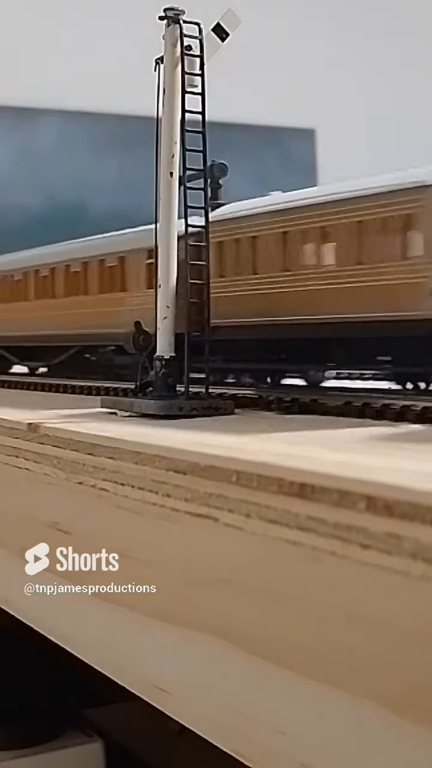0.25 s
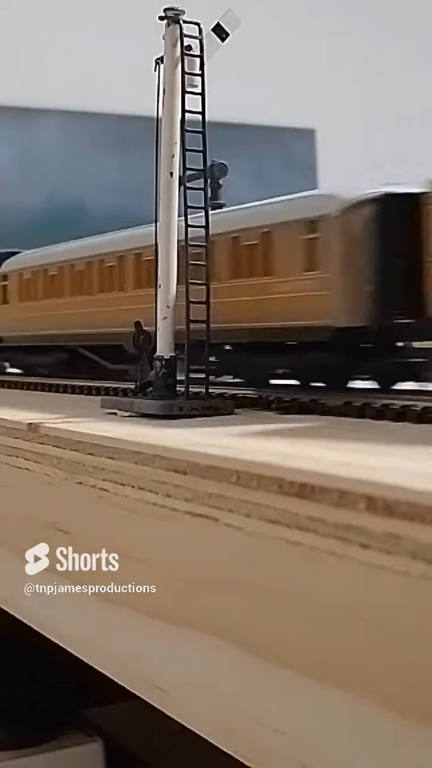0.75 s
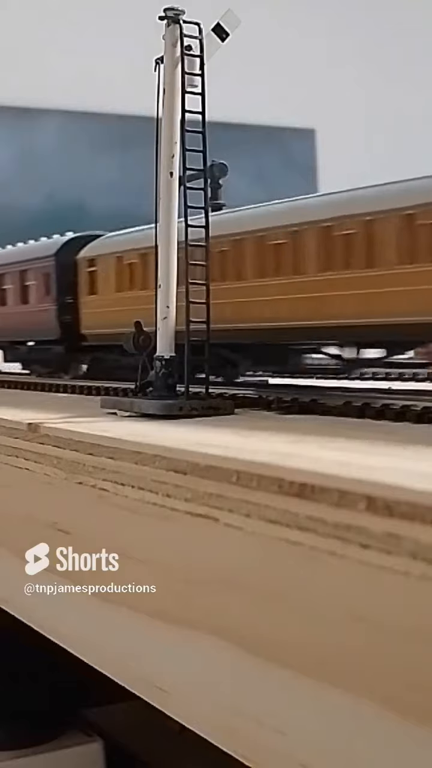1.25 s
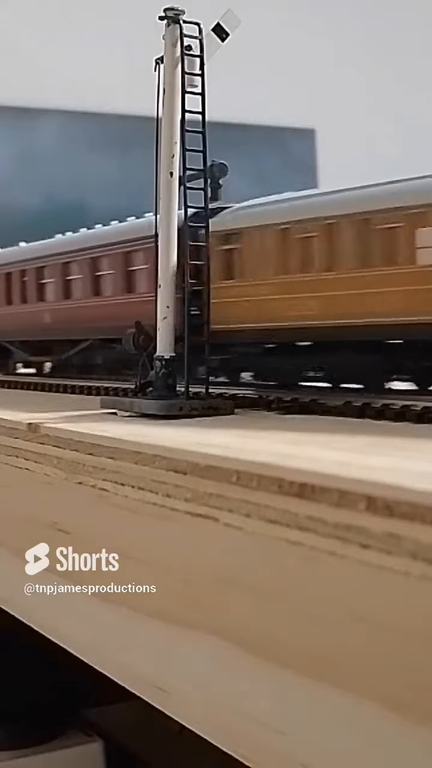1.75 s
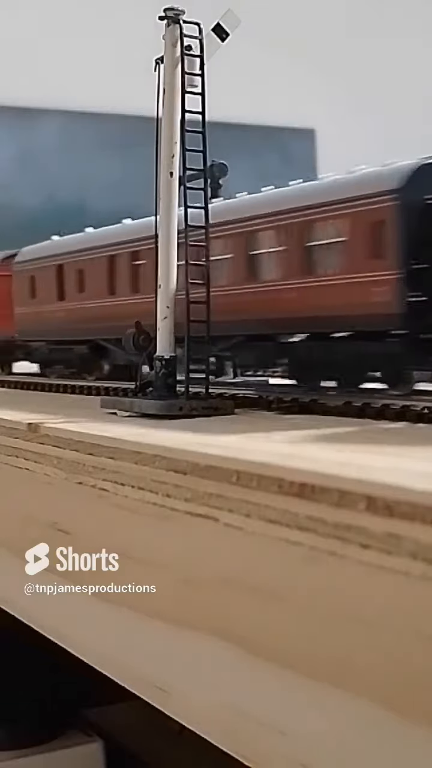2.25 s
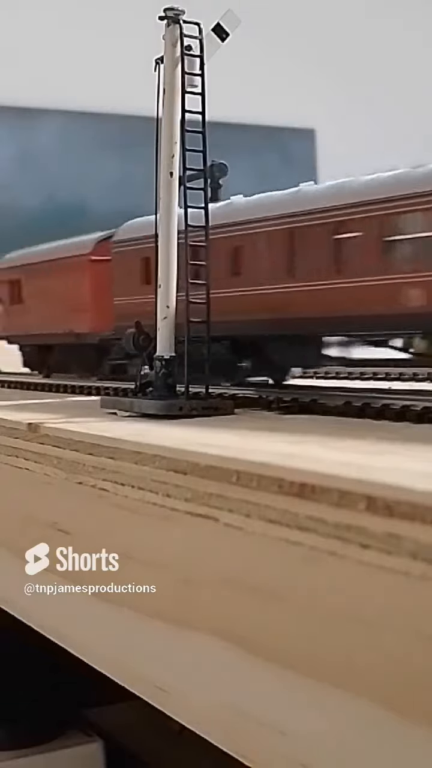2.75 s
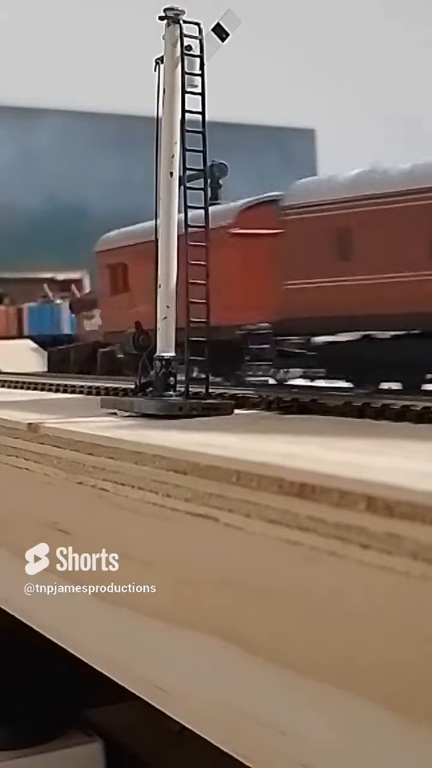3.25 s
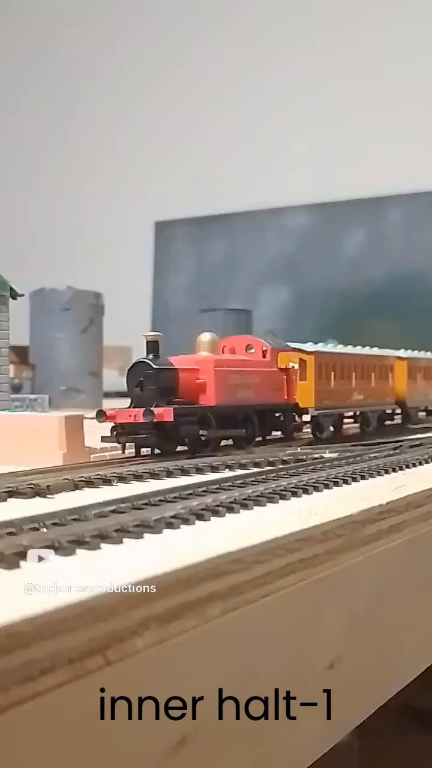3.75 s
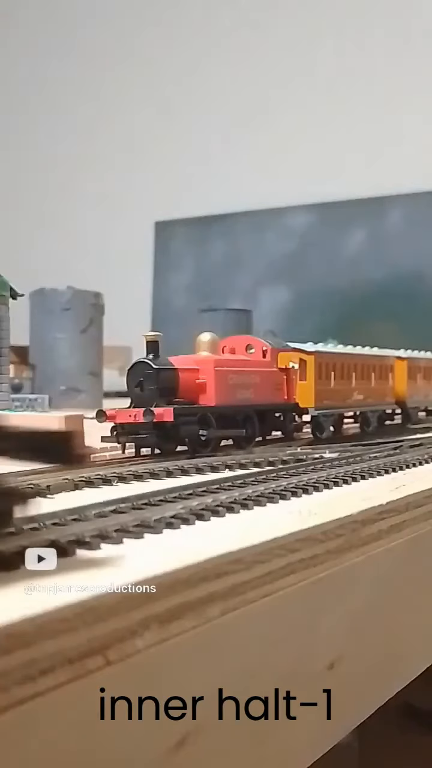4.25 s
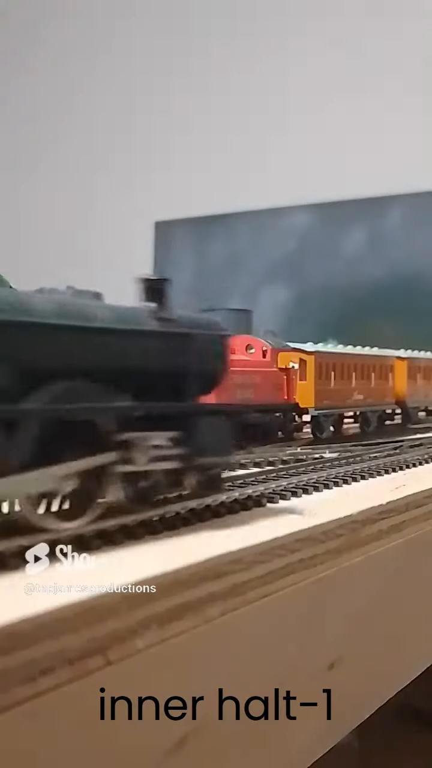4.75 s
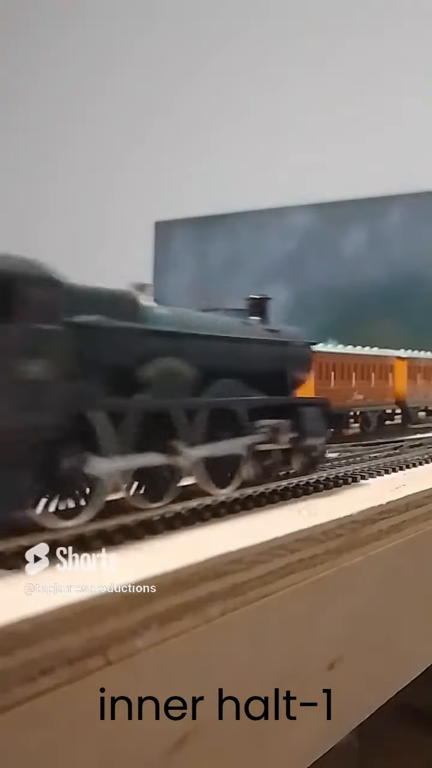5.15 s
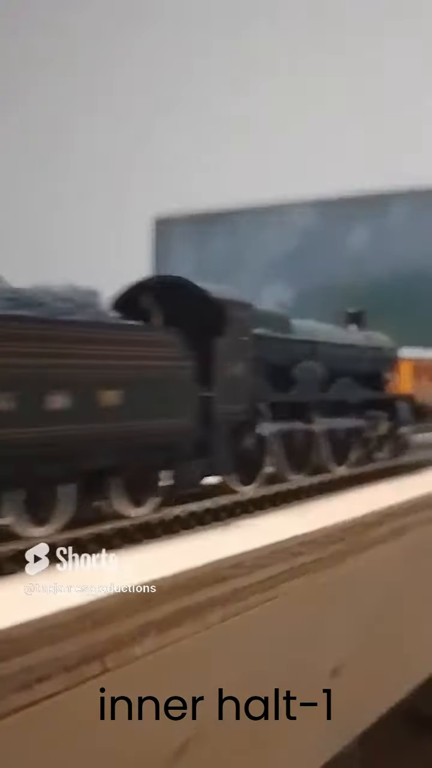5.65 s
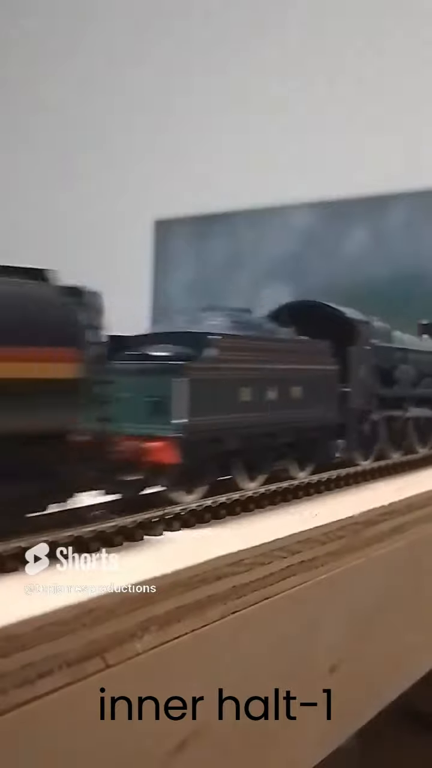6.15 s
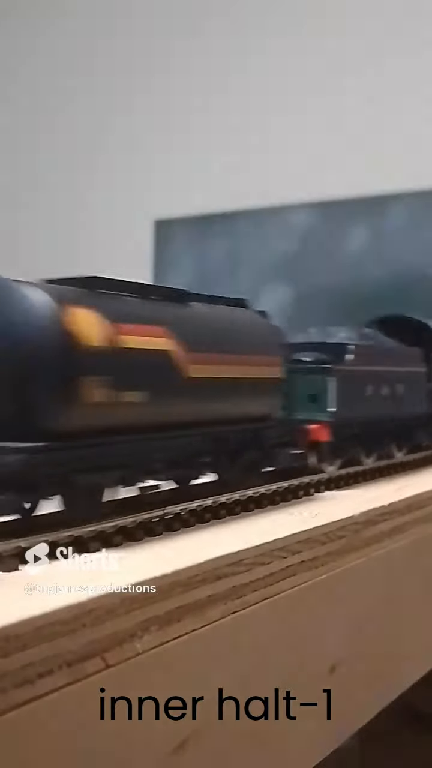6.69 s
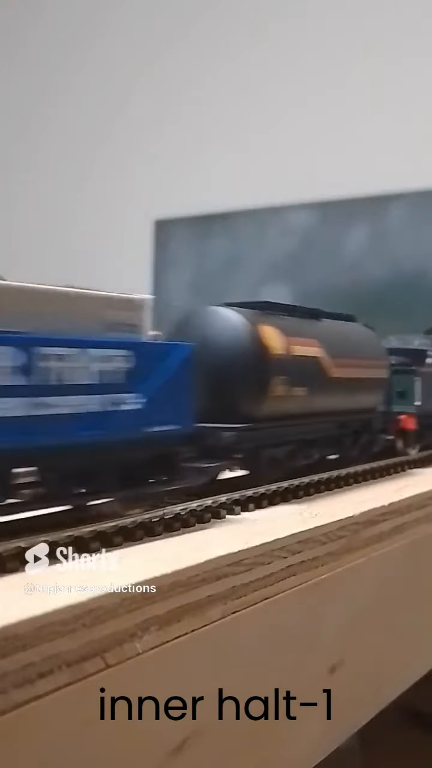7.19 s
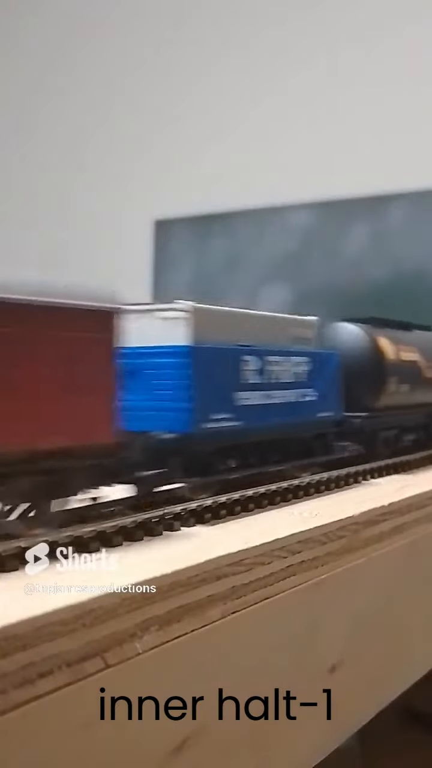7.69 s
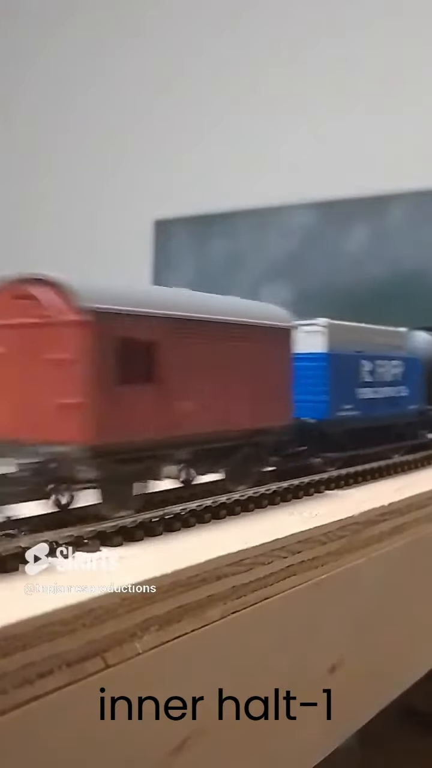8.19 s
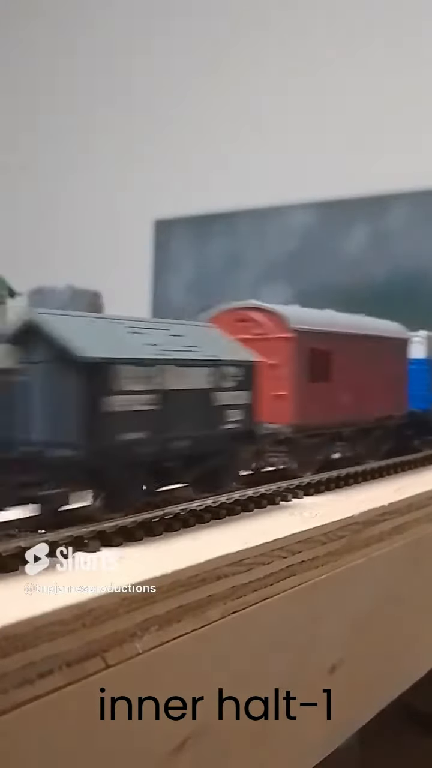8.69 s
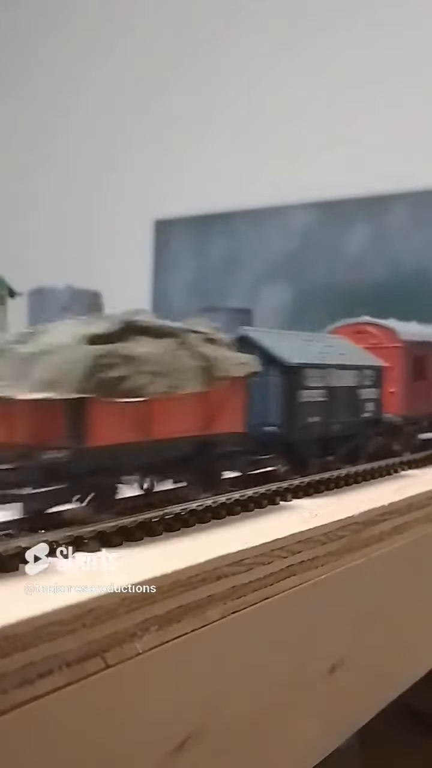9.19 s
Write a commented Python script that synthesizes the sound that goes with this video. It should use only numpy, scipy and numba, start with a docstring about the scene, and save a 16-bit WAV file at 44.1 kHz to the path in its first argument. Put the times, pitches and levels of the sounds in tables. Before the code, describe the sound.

Bright sizzling roll of small wheels stops dead; after a short gap, fast steam puffs with heavy low thumps pass close, fading under ringing wagons.

```python
"""Two scenes with a short silence between. First the small wheels of a long train hiss steadily on the rails:
broadband contact noise, rail resonances, a sizzle, a drone in the board below. Then a steam engine works past close
by, about ten exhaust beats a second, noise pulsed as boom, roar and hiss, with heavy low thumps (decaying tone pairs)
and one short jet of steam (gated noise). It fades into the distance; at the end the roll of its wagons (ringing
dull noise) swells."""
import sys
import numpy as np
from scipy import signal
from scipy.fft import rfft, irfft, next_fast_len
from scipy.io import wavfile
from scipy.ndimage import uniform_filter1d
from numba import njit

SR = 44100
rng = np.random.default_rng(int(sys.argv[2]) if len(sys.argv) > 2 else 0)


def boost_factor(decibels):
    """Convert a level in decibels to a linear amplitude factor."""
    exponent = np.asarray(decibels, float) / 20
    return 10 ** exponent


def wrap_up_sound(samples):
    """Save the sound to the file named by the first command line argument, as 16-bit audio."""
    columns = np.atleast_2d(samples).T
    # keep every value between -1 and 1, then stretch to whole-number steps
    tamed = np.clip(columns, -1, 1)
    steps = np.round(tamed * 32767).astype(np.int16)
    wavfile.write(sys.argv[1], SR, steps)


N = 415863
T = np.arange(N) / SR

# Silence between the scenes: start in seconds, end in seconds.
SILENCE_S = (3.4977, 3.6245)
# Engine passing. Each row: time in seconds, chimney boom in dB, boom centre in Hz, roar in dB, hiss in dB;
# levels ahead of the beats.
ENGINE = [(3.63, -34, 207, -19.5, -23.5), (4.1, -19.5, 240, -21, -25), (4.4, -18, 236, -17.5, -25.5),
          (4.68, -19.5, 190, -19.5, -26.5), (4.9, -16.5, 145, -17.5, -24), (5.18, -17.5, 153, -14.5, -25),
          (5.4, -18.5, 186, -19.5, -23), (5.65, -25, 188, -18.5, -25), (6.1, -26.5, 229, -23, -23.5),
          (6.4, -25, 149, -20.5, -23), (6.7, -21.5, 140, -19.5, -24.5), (7.2, -31.5, 140, -21, -25.5),
          (7.7, -31.5, 174, -23, -28.5), (8.1, -35, 230, -21.5, -29), (8.7, -40, 230, -20.5, -27),
          (9.1, -32, 171, -21, -25.5), (9.43, -34, 160, -20, -30)]
# Exhaust beats. Each row: time in seconds, strength in dB.
BEATS = [(3.687, 2), (3.78, 1.5), (3.892, 2), (3.984, 3), (4.083, 2.5), (4.18, 0.5), (4.276, 3), (4.371, 3),
         (4.486, 2.5), (4.572, 4.5), (4.668, 5.5), (4.767, 1), (4.875, 1.5), (4.974, 0), (5.089, -0.5),
         (5.181, 2), (5.273, 1.5), (5.394, -2.5), (5.497, -2), (5.581, 1), (5.708, -1), (5.812, 1.5),
         (5.907, 3.5), (6.003, -1.5), (6.122, 0.5), (6.221, 0), (6.332, -1.5), (6.441, -1.5), (6.544, 1),
         (6.653, -5), (6.756, 0), (6.865, -1), (6.967, -3), (7.057, 1), (7.16, 1), (7.271, -2), (7.364, 2),
         (7.472, 1.5), (7.59, 3), (7.68, 4), (7.782, 4.5), (7.886, -0.5), (7.99, 1), (8.087, 2), (8.21, 1),
         (8.293, 2), (8.399, 3.5), (8.514, 0), (8.606, 2.5), (8.708, 3.5), (8.831, 1), (8.923, 2),
         (9.018, 2.5), (9.132, 1.5), (9.24, 5), (9.322, 5), (9.408, 1)]


def unit(x):
    """Scale to rms 1."""
    return x / np.sqrt(np.mean(x ** 2))


def curves(table):
    """Every column after the time as a value per sample."""
    s, *columns = np.transpose(table)
    return [np.interp(T, s, c) for c in columns]


def grit(spread_db):
    """Noise of many small impacts of uneven size; rms 1."""
    uneven = 2.9 * uniform_filter1d(rng.standard_normal(N), size=9)
    return unit(rng.standard_normal(N) * boost_factor(spread_db * uneven))


def colour(x, points):
    """Shape the spectrum by (Hz, dB) points on a log frequency axis; rms 1."""
    hz, db = np.transpose(points)
    n = next_fast_len(N)
    f = np.arange(n // 2 + 1) * SR / n + 1  # +1 avoids log(0)
    gain_db = np.interp(np.log(f), np.log(hz), db, left=-90, right=-90)
    return unit(irfft(rfft(x, n) * boost_factor(gain_db), n)[:N])


@njit
def svf(x, hz, width):
    """State-variable band-pass whose centre may move; gain 1 at the centre."""
    y, b, l = np.empty(len(x)), 0., 0.
    for i in range(len(x)):
        g, k = np.tan(np.pi * hz[i] / SR), width / hz[i]
        v = (b + g * (x[i] - l)) / (1 + g * (g + k))
        b, l, y[i] = 2 * v - b, l + 2 * g * v, k * v
    return y


def walk(rate_hz):
    """Random levels held 1 / rate_hz s and slewed twice; rms 1."""
    k = int(SR / rate_hz)
    held = np.repeat(rng.standard_normal(N // k + 1), k)
    return unit(uniform_filter1d(uniform_filter1d(held, k), k)[:N])


def rings(x, modes, drift, flicker_db):
    """Resonances whose centres drift and whose levels flicker, each on its own."""
    out = np.zeros(N)
    for hz, width_hz, db in modes:
        gain = boost_factor(db + flicker_db * walk(9))
        out += gain * unit(svf(x, hz * (1 + drift * walk(5)), 1. * width_hz))
    return out


def mottle(x, patchy_db):
    """Narrow bands flare and drop out every few hundredths of a second, each on its own; rms 1."""
    z = signal.stft(x, nperseg=1536)[2]
    chance = unit(uniform_filter1d(rng.standard_normal(z.shape), size=3, axis=0))
    gain = boost_factor(patchy_db * (chance - .3 * chance ** 2))
    return unit(signal.istft(z * gain, nperseg=1536)[1][:N])


def wagons():
    """Wheels and hollow bodies ring as the wagons draw near; distance takes their treble."""
    start_s, end_db, rise_db_per_s = 8.0, -20.5, 13.5
    # Wagon resonances. Each row: centre in Hz, width in Hz, relative level in dB.
    wagon_rings = [(625, 250, 13), (1874, 96, 4), (3520, 200, -29.5)]
    dull = signal.sosfilt(signal.butter(2, 4200., fs=SR, output="sos"), grit(spread_db=4.0))
    bodies = mottle(rings(dull, wagon_rings, drift=.02, flicker_db=1.2), 2.3)
    swell = boost_factor(end_db + rise_db_per_s * (T - T[-1]))
    return bodies * swell * np.clip((T - start_s) / 0.25, 0, 1)


def wheels():
    """Countless tiny wheel contacts: a broad roll, rail resonances, a bright sizzle, a drone in the board below."""
    roll_db, drone_re_roll_db = -23.5, -20
    drone_build_db, drone_build_s = -2.5, 0.88  # starts this much lower, builds up exponentially
    # Roll spectrum. Each row: frequency in Hz, relative density in dB per Hz.
    rolling = [(180, -37.5), (300, -18), (453, -6.5), (835, -1.5), (2140, -1.5), (3400, -0.5), (4000, -2.5),
               (6790, -4.5), (8560, -11), (10100, -11.5), (14300, -5), (15500, -8)]
    # Rail resonances. Each row: centre in Hz, width in Hz, relative level in dB.
    rail_rings = [(836, 144, -6.5), (1310, 420, -9), (3480, 330, -6.5), (4960, 580, -4.5), (5530, 430, -5),
                  (11600, 500, -9), (14200, 500, -22)]
    # Sizzle bands. Each row: centre in Hz, width in Hz, relative level in dB.
    sizzle_bands = [(8350, 1500, 6), (8900, 320, -10)]
    # Sizzle swelling and sinking slowly. Each row: time in seconds, level in dB.
    sizzle_level = [(0.0, -22), (0.02, -23), (0.49, -27.5), (0.96, -24), (1.9, -25), (2.82, -23),
                    (3.36, -26), (3.48, -24.5)]
    # Drone spectrum of the board. Each row: frequency in Hz, relative density in dB per Hz.
    baseboard = [(15, -36), (25, -9.5), (75, -10.5), (182, -2), (209, -8.5), (235, 0), (400, -8),
                 (520, -41), (880, -120)]

    contacts = grit(spread_db=0.5)
    roll = colour(contacts, rolling) * boost_factor(0.26 * walk(14))
    roll = roll + boost_factor(-10.5) * rings(contacts, rail_rings, drift=0.01, flicker_db=1.1)
    roll = mottle(roll, 2.8)
    sizzle = mottle(rings(grit(spread_db=0.0), sizzle_bands, drift=0.0067, flicker_db=0.95), 2.8)
    drone_db = drone_re_roll_db + drone_build_db * np.exp(-T / drone_build_s)
    drone = boost_factor(drone_db) * colour(rng.standard_normal(N), baseboard)
    return boost_factor(roll_db) * (roll + drone) + boost_factor(curves(sizzle_level)[0]) * sizzle


def jet():
    """A short bright blast of steam: opens fast, swells while held, drops, leaves a faint tail."""
    start_s, attack_s, hold_s = 5.243, 0.013, 0.11
    open_db, swell_db = -19, 3  # ahead of the tail, which adds to it
    drop_t60_s, tail_t60_s, tail_db = 0.22, 0.55, -11.5
    # Jet spectrum. Each row: frequency in Hz, relative density in dB per Hz.
    jet_colour = [(1500, -35), (2500, -10), (4230, -3), (5050, -0.5), (6440, -8), (8480, -3.5),
                  (10500, -13), (12500, -11), (14200, -10), (15600, -8)]
    blast = mottle(colour(rng.standard_normal(N), jet_colour), 2.8)
    open_s = T - start_s
    shut_s = np.maximum(open_s - hold_s, 0)
    held = np.clip(open_s / attack_s, 0, 1) * boost_factor(open_db + swell_db * np.clip(open_s / hold_s, 0, 1))
    decay = boost_factor(-60 * shut_s / drop_t60_s) + boost_factor(tail_db - 60 * shut_s / tail_t60_s)
    return blast * held * decay


def thumps():
    """Heavy low thumps near some beats: each is a soft push that rings on two pitches and dies fast."""
    t60_s, push_s = 0.082, 0.0049
    # Heavy low thumps. Each row: start in seconds, level in dB, lower pitch in Hz.
    thump_list = [(3.765, -4, 132), (3.871, -14, 338), (3.957, 2, 309), (4.041, -5, 237), (4.169, -10, 314),
                  (4.265, 0, 241), (4.39, -1, 241), (4.661, -2, 188), (4.755, -9, 167), (4.969, -3, 172),
                  (5.394, -3, 180), (5.466, -3, 196), (5.799, -9, 221), (6.009, -6.5, 254),
                  (6.194, -13, 290), (6.421, -6, 250), (7.031, -9, 140), (8.064, -12, 343)]
    out, k = np.zeros(N), np.arange(int(.1 * SR)) / SR
    fade = (1 - np.exp(-k / push_s)) * np.exp(-np.log(1000) * k / t60_s)
    for (s, db, hz), phase in zip(thump_list, rng.random((len(thump_list), 2))):
        ring = np.sin(2 * np.pi * (hz * k + phase[0]))
        ring = ring + 0.55 * np.sin(2 * np.pi * (1.405 * hz * k + phase[1]))
        i = int(s * SR)
        out[i:i + len(k)] += boost_factor(db) * (fade * ring)[:N - i]
    return out


def rumble():
    """Low noise under the engine, sinking to a far level."""
    start_db, fade_db_per_s, far_db = -24.5, -2.5, -38.5
    # Rumble spectrum. Each row: frequency in Hz, relative density in dB per Hz.
    rumble_colour = [(12, -41), (20, -9.5), (75, -5.5), (110, -5.5), (140, -3), (240, -120)]
    rumble_db = np.maximum(start_db + fade_db_per_s * (T - SILENCE_S[1]), far_db)
    return colour(rng.standard_normal(N), rumble_colour) * boost_factor(rumble_db)


def puffs(db, rise_s, fall_s, between_db):
    """Steam flow: each beat swells fast, dies more slowly, over a flow that never stops."""
    power = np.full(N, boost_factor(between_db) ** 2)
    k = np.arange(int(.3 * SR)) / SR
    from_peak_s = k - 2 * rise_s
    shape = np.exp(-(from_peak_s / np.where(from_peak_s < 0, rise_s, fall_s)) ** 2)
    for (s, *_), d in zip(BEATS, db):
        i = int((s - 2 * rise_s) * SR)
        power[i:i + len(k)] += boost_factor(d) ** 2 * shape[:N - i]
    return np.sqrt(power)


def boom():
    """Each beat booms in the chimney, a resonance whose centre moves."""
    over_beat_db, scatter_db = -1.4, 3
    boom_db, boom_hz, _, _ = curves(ENGINE)
    beat_db = np.transpose(BEATS)[1] + over_beat_db + scatter_db * rng.standard_normal(len(BEATS))
    chimney = unit(svf(svf(grit(spread_db=1.2), boom_hz, 60.), boom_hz, 100.))
    return chimney * boost_factor(boom_db) * puffs(beat_db, 0.017, 0.027, -0.7)


def hollows():
    """Hollow parts of the engine ring in the blast while it is near; the upper ring sags in pitch."""
    upper_start_hz, sag_hz_per_s, upper_lowest_hz = 1244, -110, 1020
    # Each row: time in seconds, low rings in dB, middle rings in dB, upper ring in dB; ahead of the beats.
    hollow_levels = [(3.63, -33, -42, -29.5), (4.0, -28.5, -38, -25.5), (4.45, -24, -27, -28),
                     (4.75, -30, -32, -38), (5.15, -26, -27, -24), (5.4, -29.5, -32, -35),
                     (6.0, -26, -29, -30), (6.15, -35, -44, -38), (7.0, -44, -47, -47)]
    # Low resonances. Each row: centre in Hz, width in Hz, relative level in dB.
    low_rings = [(312, 53, -2), (428, 43, 1)]
    # Middle resonances. Each row: centre in Hz, width in Hz, relative level in dB.
    middle_rings = [(726, 59, 2), (840, 42, 2)]
    low_db, middle_db, upper_db = curves(hollow_levels)
    blast = grit(spread_db=0.0)
    low = unit(rings(blast, low_rings, drift=0.018, flicker_db=3.1)) * boost_factor(low_db)
    middle = unit(rings(blast, middle_rings, drift=0.011, flicker_db=1.5)) * boost_factor(middle_db)
    upper_hz = np.maximum(upper_start_hz + sag_hz_per_s * (T - SILENCE_S[1]), upper_lowest_hz)
    upper = unit(svf(svf(blast, upper_hz, 170.), upper_hz, 260.)) * boost_factor(upper_db)
    return (low + middle + upper) * (T < hollow_levels[-1][0])


def roar():
    """Each beat roars through the hollow body; the ground echo cancels a band; distance blurs the beats."""
    over_beat_db, blur_db_per_s, scatter_db = 1.54, -1.28, 1.5
    cancel_near, cancel_far, turn_s, turn_scale_s = 0.83, 0.23, 4.3, .1  # share cancelled 0-1
    # Band the ground echo cancels: centre in Hz, width in Hz.
    cancelled = (570, 200)
    # Roar spectrum. Each row: frequency in Hz, relative density in dB per Hz.
    roar_colour = [(53, -40), (90, -6.5), (140, -2.5), (282, 0.5), (399, 0.5), (519, -2), (695, -1.5),
                   (1450, -8.5), (2500, -12), (3250, -19), (5500, -120)]
    roar_db = curves(ENGINE)[2]
    beat_s, strength_db = np.transpose(BEATS)
    beat_db = strength_db + over_beat_db + blur_db_per_s * (beat_s - SILENCE_S[1])
    beat_db = beat_db + scatter_db * rng.standard_normal(len(BEATS))
    broad = mottle(colour(grit(spread_db=2.0), roar_colour), 2.5) * boost_factor(roar_db)
    cancel = cancel_far + (cancel_near - cancel_far) / (1 + np.exp((T - turn_s) / turn_scale_s))
    echo = svf(broad, np.full(N, 1. * cancelled[0]), 1. * cancelled[1])
    broad = broad - np.clip(cancel, 0, 1) * echo
    return (broad + hollows()) * puffs(beat_db, 0.026, 0.031, -1.85)


def hiss():
    """Each beat hisses, with airy treble on top that distance takes away."""
    air_re_hiss_db, recedes_s, air_loss_db_per_s = -4, 6.72, -4.5
    # Hiss spectrum. Each row: frequency in Hz, relative density in dB per Hz.
    hiss_colour = [(1060, 1), (1800, 1), (2050, 0), (3340, -0.5), (7000, -13), (9100, -18.5), (15400, -120)]
    # Air spectrum. Each row: frequency in Hz, relative density in dB per Hz.
    air_colour = [(3820, -10.5), (6500, -6), (8690, -3.5), (10800, -12), (14000, -13), (14800, -16),
                  (15500, -19)]
    hiss_db = curves(ENGINE)[3]
    air_db = hiss_db + air_re_hiss_db + air_loss_db_per_s * np.maximum(T - recedes_s, 0)
    steam = mottle(grit(spread_db=1.5), 2.8)
    flow = puffs(np.transpose(BEATS)[1], 0.024, 0.039, -2.0)
    # the faster the flow, the brighter: the top beats more deeply
    air = colour(steam, air_colour) * boost_factor(air_db) * flow ** 1.05
    return colour(steam, hiss_colour) * boost_factor(hiss_db) * flow + air


def engine():
    """Every exhaust beat booms, roars and hisses at once, over a rumble."""
    return rumble() + boom() + roar() + hiss()


def scene():
    """The first scene stops dead; the second starts at full level; both channels alike."""
    stop_s, start_s = SILENCE_S
    first = np.clip((stop_s - T) / 0.0018, 0, 1) * wheels()
    second = np.clip((T - start_s) / 0.00087, 0, 1) * (wagons() + jet() + thumps() + engine())
    return np.tile(first + second, (2, 1))


def band_limit(x):
    """A steep low-pass at the top of the band."""
    return signal.sosfilt(signal.butter(12, 16090, fs=SR, output="sos"), x)


def record(dry):
    """A limiter holds loud stretches down, the peaks that slip through are rounded, the top is cut."""
    limit, ceiling, top_hz = 0.51, .8, 15600
    peak = np.sqrt(2 * signal.lfilter([.004], [1, .004 - 1], dry ** 2))
    held = dry / (1 + (peak / limit) ** 4) ** 0.21
    rounded = ceiling * np.tanh(held / ceiling)
    edge = np.clip((top_hz - np.arange(N // 2 + 1) * SR / N) / 120, 0, 1)  # 120 Hz wide
    mix = irfft(rfft(rounded) * np.sin(edge * np.pi / 2) ** 2, N)
    return band_limit(mix)


dry = scene()
out = record(dry)
wrap_up_sound(out)
```